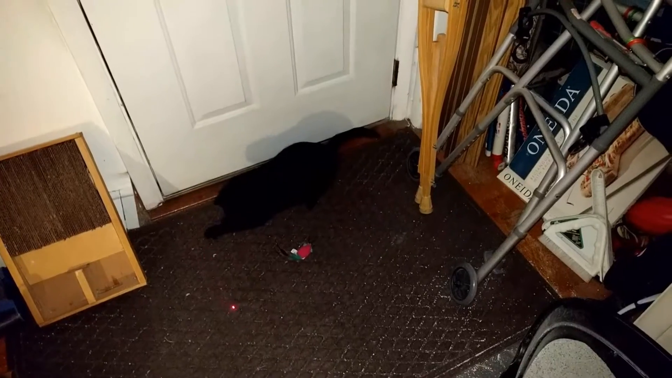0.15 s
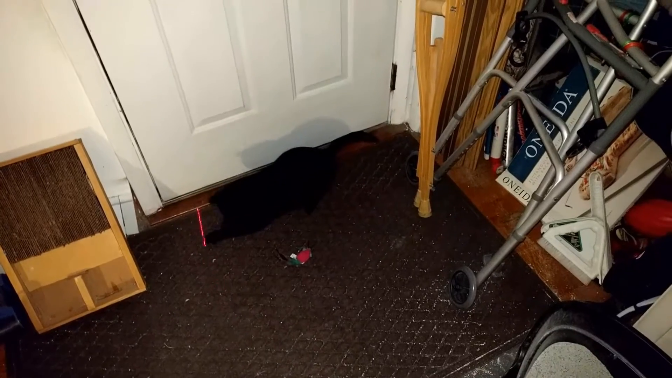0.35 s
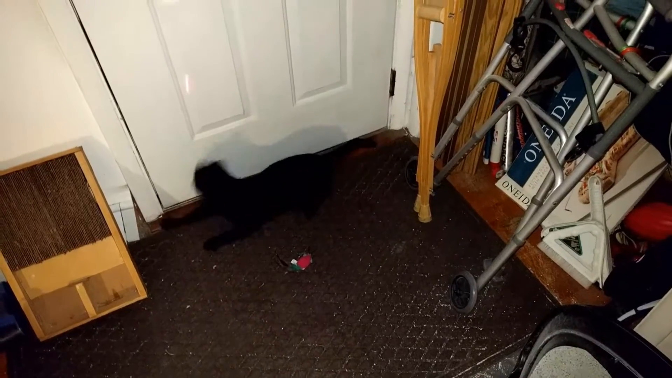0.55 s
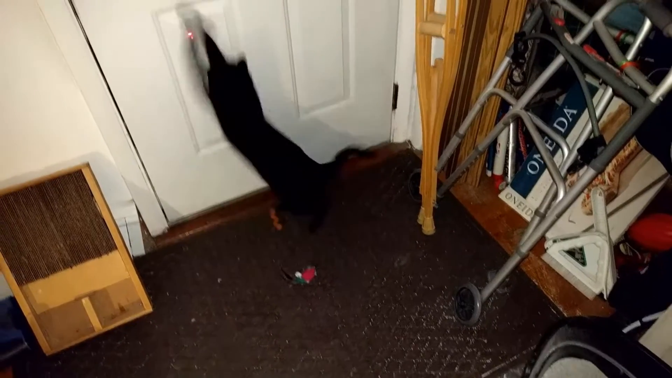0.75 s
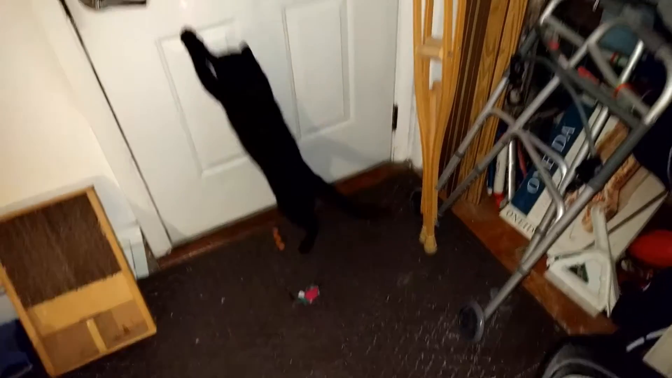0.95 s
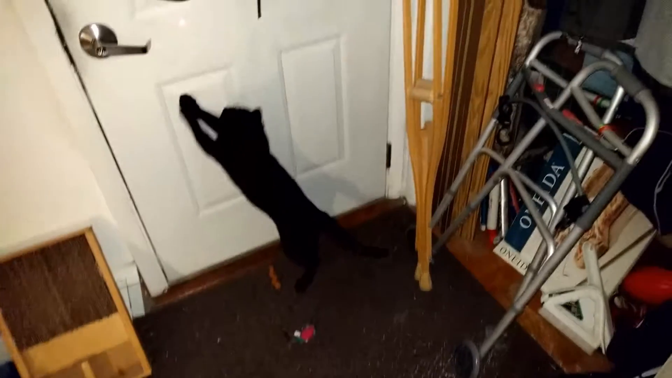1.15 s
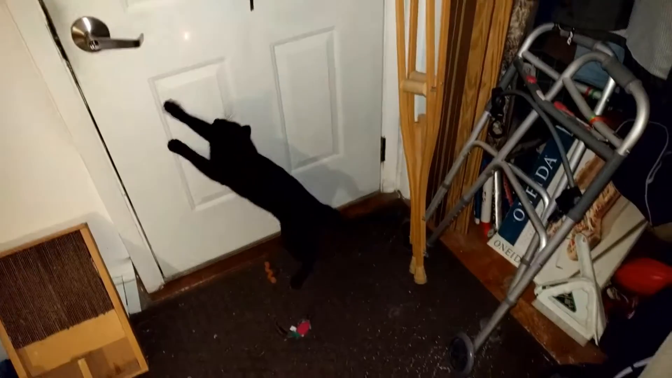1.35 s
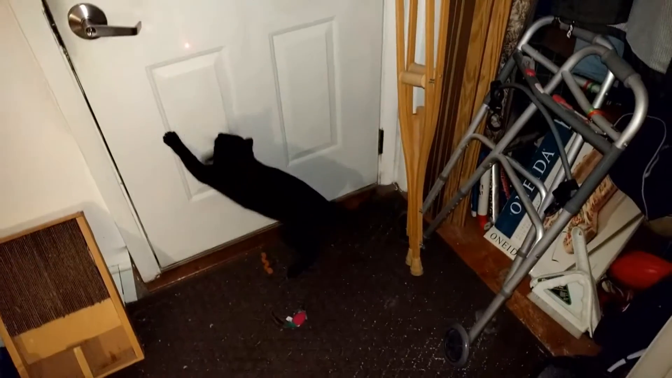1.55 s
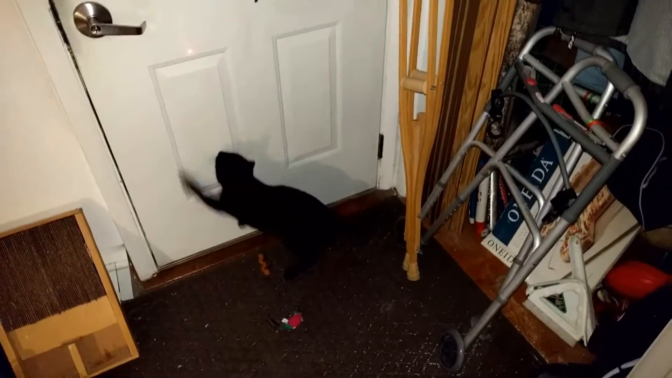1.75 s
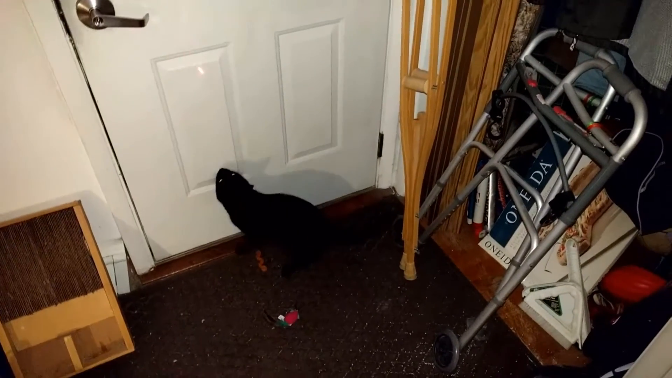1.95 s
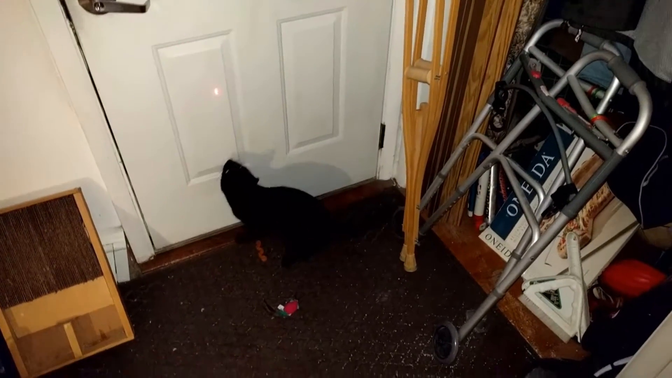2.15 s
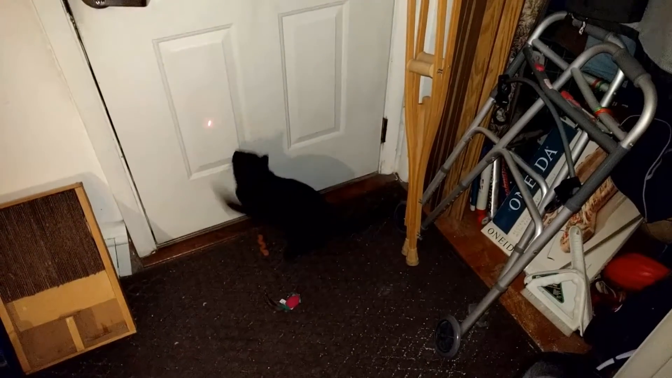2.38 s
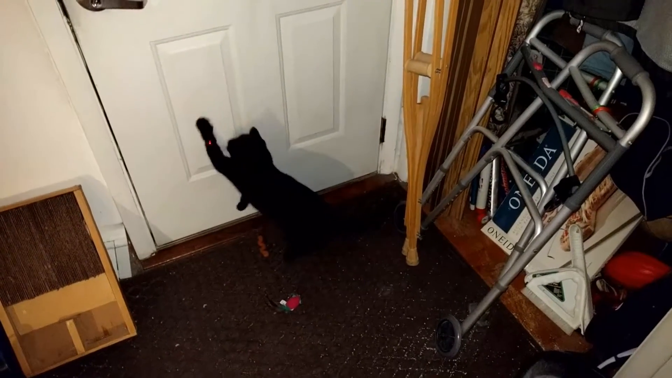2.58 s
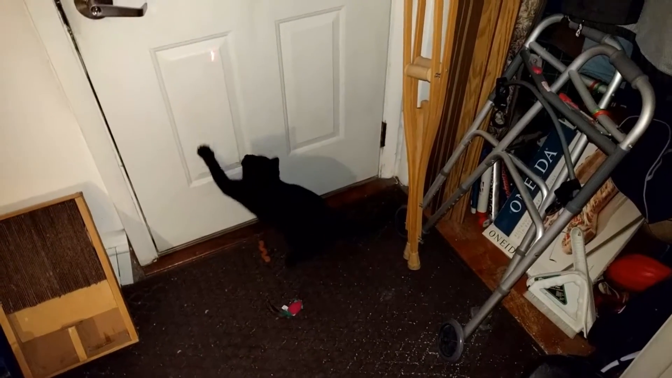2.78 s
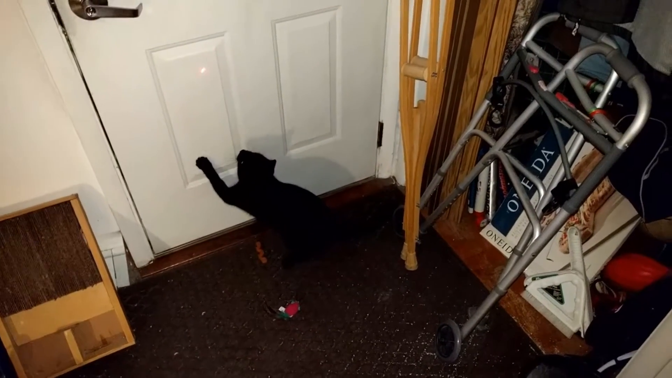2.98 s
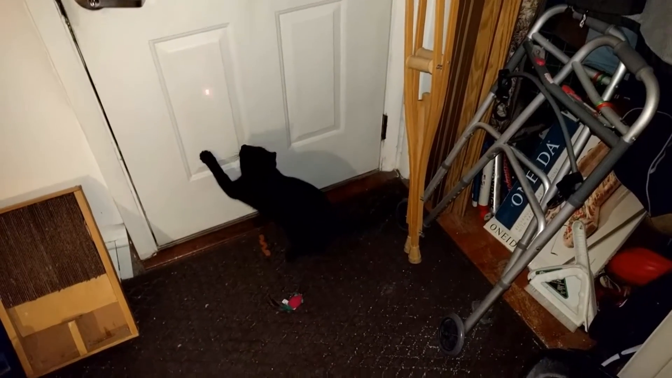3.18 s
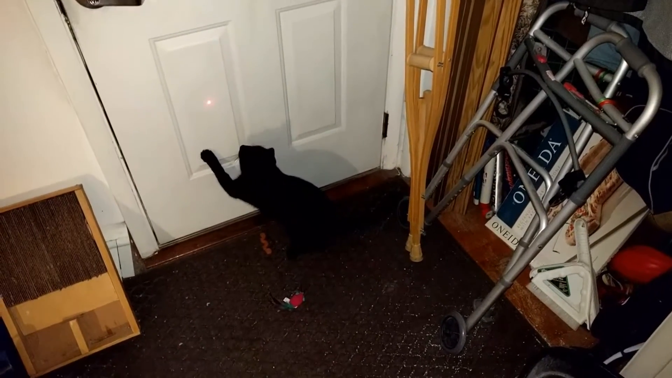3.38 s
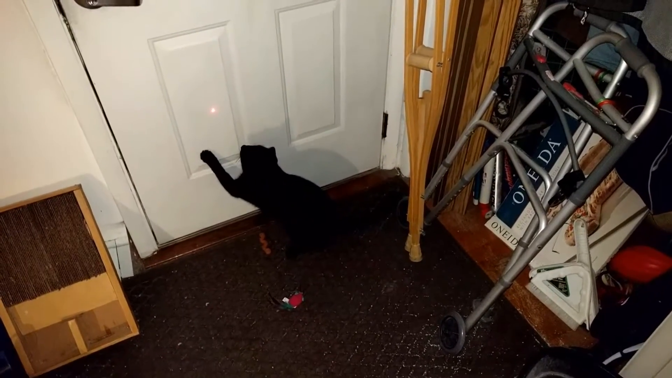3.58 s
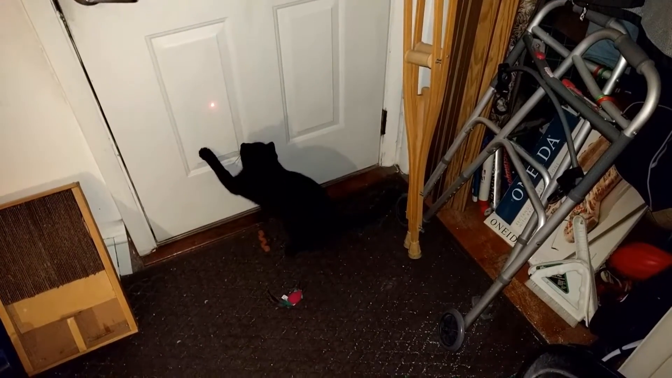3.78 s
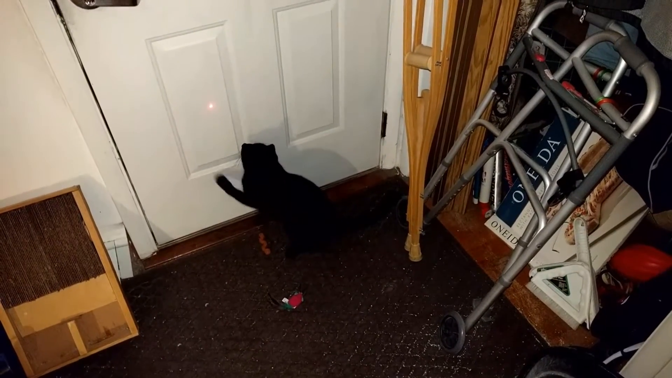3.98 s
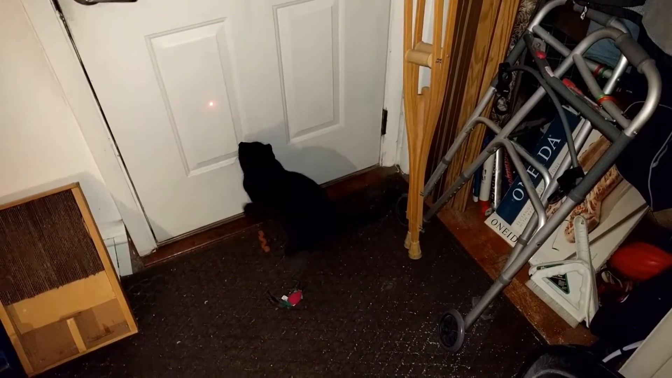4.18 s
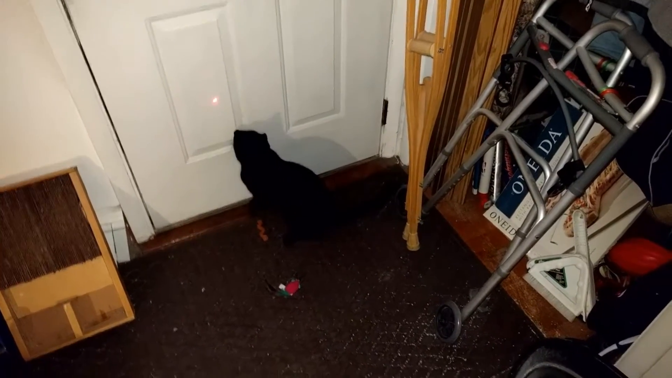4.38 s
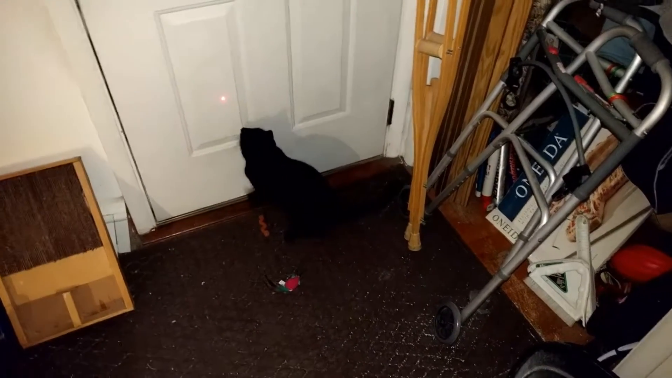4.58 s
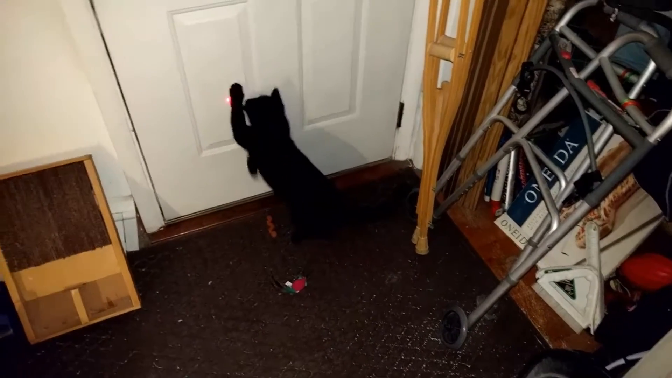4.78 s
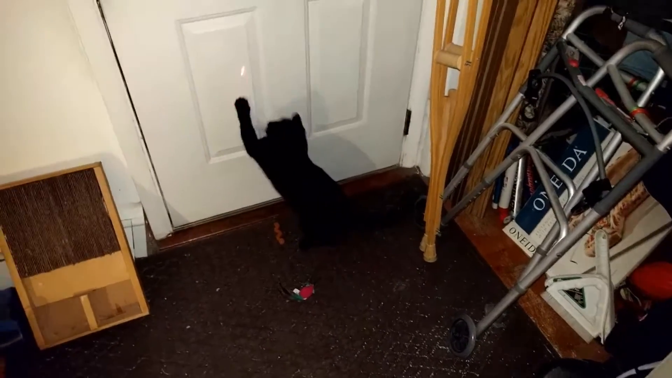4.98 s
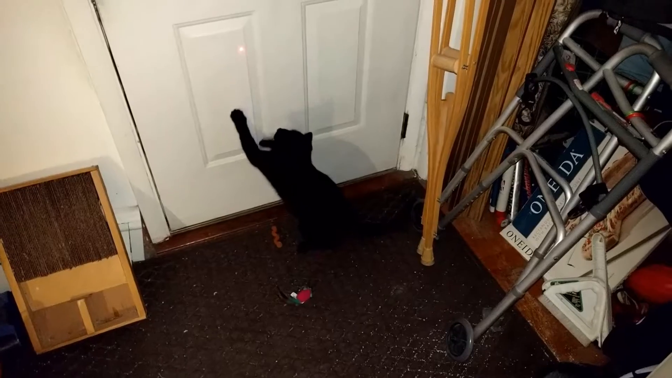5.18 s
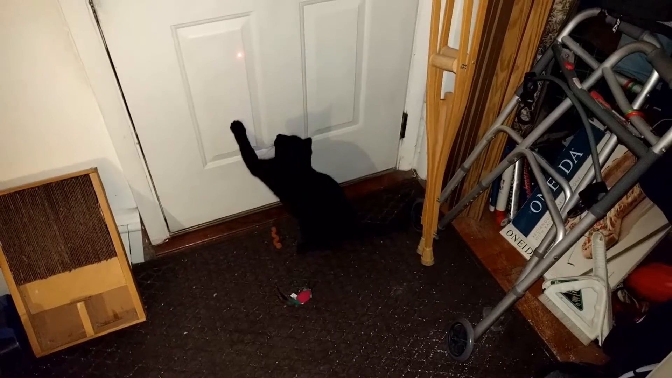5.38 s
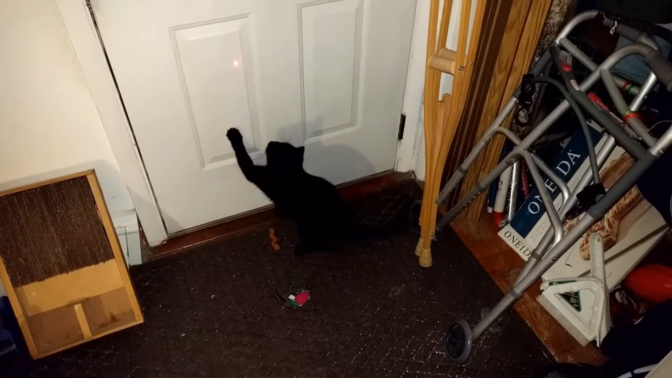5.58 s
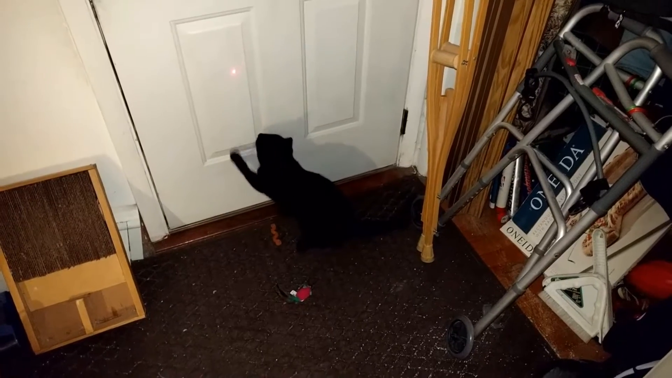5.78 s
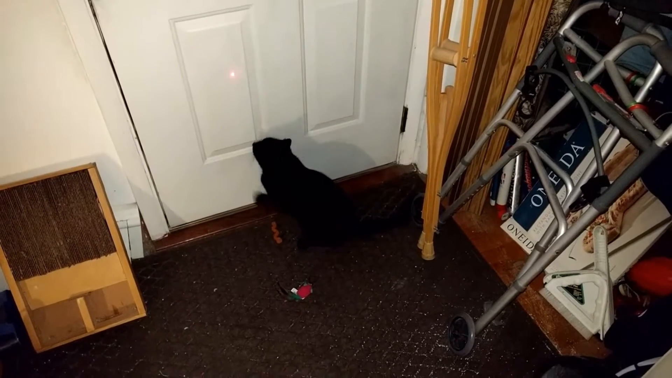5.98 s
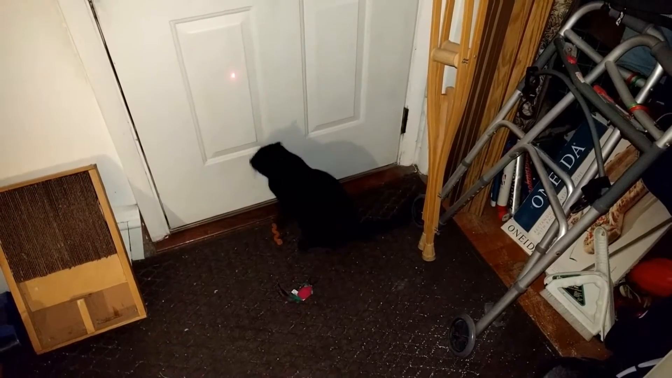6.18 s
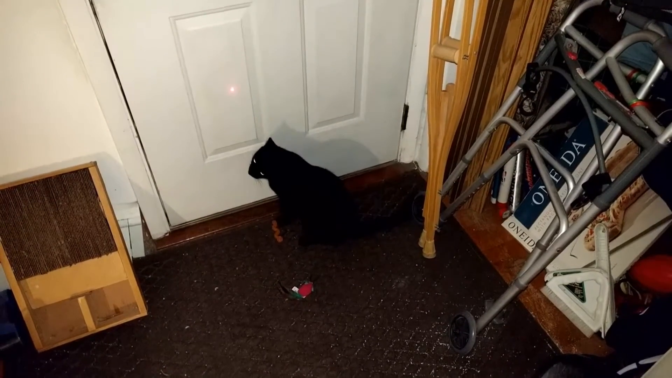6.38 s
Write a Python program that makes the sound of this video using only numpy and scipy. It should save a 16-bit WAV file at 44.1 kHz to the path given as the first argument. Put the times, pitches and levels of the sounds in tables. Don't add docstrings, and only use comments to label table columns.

```python
import sys
import numpy as np
from scipy import signal
from scipy.fft import rfft, irfft
from scipy.io import wavfile
from scipy.ndimage import uniform_filter1d

SR = 44100
rng = np.random.default_rng(int(sys.argv[2]) if len(sys.argv) > 2 else 0)


def invert_db(level):
    return 10 ** (np.asarray(level, dtype=float) / 20)


def store_wav(level_fs):
    pcm = np.round(np.clip(np.atleast_2d(level_fs), -1, 1) * 32767)
    wavfile.write(sys.argv[1], SR, pcm.T.astype(np.int16))


N = 283869

# t/s, peak level/dB, thud re peak/dB, knock re peak/dB, lead-in brush re peak/dB
SLAPS = [
    (0.602, -22, -49.5, -16, -15),
    (0.912, -37, -14, -23, -34),
    (0.931, -11.5, -38, -17, -19.5),
    (1.479, -28, -23.5, -11, -37),
    (2.625, -12.5, -28, -14.5, -16),
    (4.871, -11, -33, -16.5, -20),
]
GATE_SHARE = (2.22, 1.44, .9, 1.7)
HAND_DB = -65.5
STEP = 32


def rms_one(x):
    return x / np.sqrt(np.mean(x ** 2) + 1e-20)


def at_hz(points, hz):
    f, value = np.transpose(points)
    return np.interp(np.log(np.maximum(hz, 1)), np.log(f), value)


def coloured(x, spectrum, low_hz, high_hz):
    hz = np.fft.rfftfreq(x.shape[-1], 1 / SR)
    gain = invert_db(at_hz(spectrum, hz))
    inside = (hz > low_hz) & (hz < high_hz)
    band_rms = np.sqrt(np.sum(gain[inside] ** 2) / len(hz))
    return irfft(rfft(rms_one(x)) * gain, x.shape[-1]) / band_rms


def drift(rate):
    every = 40
    r = np.exp(-2 * np.pi * rate * every / SR)
    draws = rng.standard_normal(N // every + 2002)
    slow = signal.lfilter([1], [1, -2 * r, r * r], draws)[2000:]
    return np.interp(np.arange(N) / every, np.arange(len(slow)), rms_one(slow))


def resonance(x, hz, width_hz):
    r = np.exp(-np.pi * width_hz / SR)
    poles = [1, -2 * r * np.cos(2 * np.pi * hz / SR), r * r]
    return signal.lfilter((1 - r * r) / 2 * np.array([1, 0, -1]), poles, x)


def burst(at_s, rise_s, t60):
    t = np.maximum(np.arange(N) / SR - at_s, 0)
    return (1 - np.exp(-t / rise_s)) * invert_db(-60 * t / t60)


def grit(per_s, spread_db):
    sizes = invert_db(spread_db * np.minimum(rng.exponential(1, N), 4)) * rng.choice([-1, 1], N)
    return sizes * (rng.random(N) < per_s / SR)


def swells(at_s, db, swell_s, fade_s):
    t = np.arange(0, N + STEP, STEP) / SR - np.asarray(at_s)[:, None]
    share = np.where(t < 0, -t / np.abs(swell_s)[:, None], t / np.abs(fade_s)[:, None])
    return np.asarray(db)[:, None] - 20 * share


def power_sum(levels_db):
    total = np.sqrt(np.sum(invert_db(2 * levels_db), axis=0))
    return np.interp(np.arange(N) / STEP, np.arange(len(total)), total)


def slaps():
    # f/Hz, level/dB, t60/s
    door_modes = [(61.7, 4.5, 0.12), (134.4, -6.5, 0.75), (150, -2.5, 0.061), (220.2, -23, 0.074),
                  (253, -20, 0.13), (377, 0, 0.16), (473, -22.5, 0.068), (623, -14.5, 0.061),
                  (766, -28, 0.38)]
    # f/Hz, density/dB
    rattle_spectrum = [(90, -39.5), (140, 0), (250, 4.5), (380, -9.5), (700, -9), (1000, -12),
                       (1200, -52.5)]
    # f/Hz, density/dB
    crack_spectrum = [(530, -31), (900, -21.5), (1340, -6.5), (2230, -9), (3740, -7), (4110, -6.5),
                      (6350, -2), (11600, -18), (13800, -27), (14300, -80.5), (15000, -45)]
    toes = grit(20000, 3.5)
    crack = coloured(toes * invert_db(0.66 * drift(150)), crack_spectrum, 1200, 12000)
    crack = crack + 1.16 * resonance(crack, 6950, 820)
    rattle = coloured(rng.standard_normal(N), rattle_spectrum, 130, 900)
    t, out = np.arange(N) / SR, np.zeros(N)
    push = np.zeros((len(door_modes), N))
    chance = rng.normal(0, 1, (len(SLAPS), len(door_modes)))
    lowest = np.arange(len(door_modes)) < 1
    for (s, db, thud_db, knock_db, brush_db), luck in zip(SLAPS, chance):
        brush = invert_db(brush_db - 1020 * np.abs(s - t)) * (t > s - .03) * (t < s + .01)
        contact = 3.65 * burst(s, 0.017, 0.042) + 0.53 * burst(s, 0.019, 0.23) + brush
        out += invert_db(db - 8.5) * crack * contact
        out += invert_db(db + knock_db - 10.0) * rattle * burst(s, 0.0083, 0.37)
        push[:, round(s * SR)] = invert_db(db + np.where(lowest, thud_db, knock_db) + 2.5 * luck)
    for (hz, db, t60), kick in zip(door_modes, push):
        r, w = invert_db(-60 / (t60 * SR)), 2 * np.pi * hz / SR
        soft = signal.lfilter([.03], [1, -.97], kick + 1e-18)
        out += invert_db(db - 11.0) * signal.lfilter([0, np.sin(w)], [1, -2 * r * np.cos(w), r * r], soft)
    return out


def through_skin(x):
    # f/Hz, bandwidth/Hz, level/dB
    skin_modes = [(1299, 67, -1), (1590, 164, -4), (2026, 180, -5.8), (2700, 530, 2.5), (2730, 880, 0.5),
                  (3780, 230, -11.5)]
    modes = 0
    for k, (hz, width_hz, db) in enumerate(skin_modes):
        modes = modes + (-1) ** k * invert_db(db) * resonance(x, hz, width_hz)
    modes = signal.sosfilt(signal.butter(6, 1150, "high", fs=SR, output="sos"), modes)
    return rms_one(signal.sosfilt(signal.butter(4, 4500, fs=SR, output="sos"), modes))


def slides():
    # t of most force/s, hiss level/dB, swell/s, fade/s, skin re hiss/dB
    strokes = [(.718, -73, 0.06, 0.24, -17), (.796, -64.5, 0.012, 0.043, -24),
               (0.883, -72, 0.033, .04, -16), (0.998, -42, .02, .11, -4), (1.245, -47.5, 0.51, 0.17, -13),
               (1.464, -44, 0.11, 0.039, -12.5), (1.54, -44, .06, .13, -16.5),
               (1.807, -57.5, 0.056, .07, -12), (2.689, -34, 0.06, .25, -20.5),
               (2.878, -43, 0.27, 0.41, -9.5), (3.0, -37, 0.7, 0.14, -14), (3.35, -70.5, 0.6, 0.18, -11.5),
               (4.16, -58.5, 0.021, 0.086, -11.5), (4.93, -35.5, 0.042, 0.089, -11),
               (5.134, -35, 0.13, .2, -10), (5.34, -43.5, 0.1, 1, -11), (5.55, -56.5, 0.64, 0.45, 3.5),
               (5.801, -59, 0.13, 0.12, 6), (5.868, -39.5, .12, 0.05, -20.5), (6.1, -66, 0.043, 0.064, -14),
               (6.194, -61, 0.13, 0.12, -12), (.05, -72, 0.064, 0.23, -15), (4.0, -70.5, 0.16, 0.29, -8.5)]
    # t/s, edge level/dB, swell/s, fade/s
    digs = [
        (.595, -62, .03, .03),
        (1.26, -58, .1, 0.11),
        (1.53, -52, 0.2, 0.059),
        (1.81, -64, .05, 0.066),
        (2.94, -48, 0.25, 0.17),
    ]
    # f/Hz, density/dB
    rub_spectrum = [(1760, -16.5), (3000, -14.5), (4130, -9.5), (4360, -8), (6620, -0.5), (10700, -28),
                    (11600, -31.5), (12400, -40), (13300, -58.5)]
    lift_offs = [.86, 1.7, 3.168, 5.921, 6.3]
    lift_db_per_s = 235
    s, db, swell_s, fade_s, skin_db = np.transpose(strokes)
    t = np.arange(0, N + STEP, STEP) / SR
    landed = np.array([max([0] + [row[0] for row in SLAPS if row[0] < a]) for a in s])
    lifted = np.array([min(off for off in lift_offs + [N / SR] if off > a) for a in s])
    force_db = swells(s, db, swell_s, fade_s)
    force_db = force_db - lift_db_per_s * np.maximum(t - lifted[:, None], 0)
    force_db = force_db - 100 * (t < landed[:, None])
    edge_db = -30.5 - 0.39 * skin_db
    edge_levels = np.vstack([force_db + edge_db[:, None] - 0.5, swells(*np.transpose(digs))])

    hiss = coloured(grit(20000, 0.4) * invert_db(1.02 * drift(40)), rub_spectrum, 2700, 9000)
    hiss = signal.sosfilt(signal.butter(8, 1300, "high", fs=SR, output="sos"), hiss)
    edge = signal.sosfiltfilt(signal.butter(3, 8800, "high", fs=SR, output="sos"), hiss)
    skin = through_skin(grit(12000, 2.8) * invert_db(1.3 * drift(30)))
    rubbing = power_sum(force_db) * (hiss - edge)
    claws = power_sum(edge_levels) * rms_one(edge)
    return rubbing + claws + power_sum(force_db + skin_db[:, None] + 3.5) * skin


def in_time(rows):
    s, *columns = np.transpose(rows)
    return [np.interp(np.arange(N) / SR, s, c) for c in columns]


def while_on(spans, fade_s):
    t, total = np.arange(N) / SR, 0
    for rows in spans:
        inside_s = np.minimum(t - rows[0][0], rows[-1][0] - t)
        total = total + np.clip((inside_s + fade_s) / fade_s, 0, 1)
    return total


def squeaks():
    # t/s, slip rate f/Hz, level/dB
    slip_curves = [
        [(.97, 1450, -44), (1.06, 1290, -63.5), (1.25, 1450, -62.5), (1.32, 1350, -63), (1.36, 1330, -65)],
        [(2.78, 2020, -51.5), (2.84, 2150, -46), (2.88, 2210, -40.5), (2.925, 1940, -46.5), (2.95, 2530, -46.5),
         (3.0, 2750, -52), (3.09, 2800, -56)],
        [(5.05, 1670, -55), (5.135, 1780, -33), (5.18, 1760, -39.5), (5.23, 1800, -46.5), (5.28, 2060, -51.5),
         (5.38, 2310, -44.5), (5.45, 2300, -49), (5.5, 2540, -48), (5.56, 2560, -58)],
    ]
    # overtones/dB, flutter/1
    grips = [
        (-28, 1.6),
        (-3, 0.81),
        (-8, .9),
    ]
    slip_hz, db = in_time(np.vstack(slip_curves))
    grip_rows = []
    for rows, grip in zip(slip_curves, grips):
        grip_rows += [(rows[0][0], *grip), (rows[-1][0], *grip)]
    over_db, flutter = in_time(grip_rows)
    wander = 0.082 * drift(60.07) + 0.16 * drift(300)
    phase = 2 * np.pi * np.cumsum(slip_hz + flutter * (slip_hz - 950) * wander) / SR
    overtones = np.sin(2 * phase) + .5 * np.sin(3 * phase)
    tone = np.sin(phase) + invert_db(over_db - 0.5) * overtones
    return while_on(slip_curves, 0.0094) * invert_db(db + 2.5 + 0.74 * drift(80)) * tone


def bumps():
    # t/s, peak level/dB, f/Hz
    soft_bumps = [(0.019, -53, 218), (.606, -59, 198), (.608, -43, 732), (.928, -31, 233), (.93, -29, 136),
                  (.93, -31.5, 1314), (.932, -36, 1580), (.975, -34.5, 194), (1.05, -42.5, 182),
                  (1.48, -51.5, 477), (1.488, -43, 232), (1.618, -73, 130), (2.023, -44, 189),
                  (2.071, -50.5, 135)]
    t, out = np.arange(N) / SR, 0
    for s, db, hz in soft_bumps:
        out = out + invert_db(db + 8) * burst(s, 0.0055, 0.064) * np.sin(2 * np.pi * hz * (t - s))
    return out


def hall(x):
    # f/Hz, t60/s
    hall_decay = [(100, 0.12), (1500, 0.053), (6000, 0.053), (12000, 0.06)]
    t, band_edges = np.arange(SR // 2) / SR, 100 * 2. ** np.arange(8)
    white, echo = rng.standard_normal((2, len(t))), 0
    for low, high in zip(band_edges, band_edges[1:]):
        band = signal.sosfilt(signal.butter(2, [low, high], "band", fs=SR, output="sos"), white)
        t60 = at_hz(hall_decay, np.sqrt(low * high))
        echo = echo + band * invert_db(-60 * t / t60) * (t > .005)
    echo = echo / np.sqrt(np.sum(echo[0] ** 2))
    mid, side = signal.fftconvolve(x[None], echo, axes=1)[:, :N]
    return mid + .8 * side * np.array([[1], [-1]])


def handling():
    # t/s, level/dB, length/s
    jolts = [(0.046, -55, 0.052), (.14, -57, 0.064), (0.284, -60, 0.073), (1.178, -34.5, 0.064),
             (1.24, -46, 0.073), (1.337, -48.5, 0.21), (1.497, -46, 0.074), (1.564, -45.5, 0.14),
             (1.645, -38, 0.035), (1.716, -39, 0.055), (1.825, -45, 0.1), (1.987, -45.5, 0.17),
             (2.123, -51, 0.11), (2.9, -61.5, .05), (2.969, -56, 0.18), (3.421, -73, 0.082),
             (3.917, -40.5, 0.054), (3.987, -34, 0.029), (4.055, -43, 0.071), (4.153, -35.5, 0.031),
             (4.332, -48, 0.17), (4.461, -44, 0.052), (4.606, -38.5, 0.034), (5.57, -52.5, 0.12),
             (6.206, -48.5, 0.11), (6.318, -41, 0.12)]
    s, db, length = np.transpose(jolts)
    return power_sum(swells(s, db, 0.64 * length, length))


def gate_db():
    # t from/s, t to/s, change/dB
    gate_moves = [(0.211, 0.253, -6.5), (0.331, 0.423, -5.5), (0.49, 0.54, -2), (0.796, .89, -1),
                  (1.0, 1.6, 3), (2.248, 2.258, -8.5), (2.357, 2.359, -6), (2.805, 2.949, -8.5),
                  (2.97, 3.132, 5), (3.17, 3.24, 0.5), (3.487, 3.591, -12), (3.81, 3.826, -3),
                  (4.153, 4.158, 3), (4.711, 4.728, -5.5), (4.797, 4.828, -2), (4.95, 5.905, 4.5),
                  (6.035, 6.065, 0)]
    t, total, ramp_s = np.arange(N) / SR, 0, 0.046
    for start, end, db in gate_moves:
        total = total + db * np.clip(np.minimum(t - start, end - t) / ramp_s + 1, 0, 1)
    return total


def rumble():
    # t/s, level/dB, swell/s, fade/s
    shudders = [
        (.945, -35.5, 0.041, 0.16),
        (1.09, -41.5, 0.13, 0.022),
        (2.65, -28.5, 0.031, 0.066),
        (2.719, -37.5, .1, 0.13),
        (4.9, -32, 0.042, 0.18),
        (4.979, -32, 0.098, 0.068),
    ]
    wobble_hz = 62 * invert_db(1.6 * drift(4.1) + 2.1 * drift(30))
    phase = 2 * np.pi * np.cumsum(wobble_hz) / SR
    tremor = invert_db(HAND_DB + GATE_SHARE[3] * np.minimum(gate_db(), 0))
    shudder = power_sum(swells(*np.transpose(shudders)))
    force = np.hypot(np.hypot(handling(), shudder), tremor)
    cycles = np.sin(phase) + 0.14 * np.sin(2 * phase + 3 * drift(6))
    return force * invert_db(-1.0 + 4.1 * drift(4.1)) * cycles


def room_tone():
    # f/Hz, density/dB
    hiss_spectrum = [(900, -4.5), (2000, 2.5), (3700, -2), (6400, 1.5), (8800, -4.5), (15500, -5.5),
                     (17000, -10.5)]
    murmur_spectrum = [(300, -18.5), (400, -1.5), (700, -4.5), (1000, -7), (1500, -12), (2200, -28.5)]
    hum_spectrum = [(60, -19), (110, 8.5), (250, 6.5), (400, -1), (520, -20)]
    rest_levels = (-82, -77.5, -72)
    jolt = uniform_filter1d(handling(), size=2000) / invert_db(HAND_DB)
    opened_db = gate_db() + 0.067 * 20 * np.log10(1 + jolt)
    hiss_db, murmur_db, hum_db = [db + share * opened_db for db, share in zip(rest_levels, GATE_SHARE)]
    after = sum(invert_db(row[1]) * burst(row[0], 0.0055, 1) for row in SLAPS)

    def swollen(db, after_slap_db, loudest_db):
        swell = invert_db(after_slap_db + np.minimum(opened_db, 0)) * after
        return np.minimum(np.hypot(invert_db(db), swell), invert_db(loudest_db))

    murmur_gain, hum_gain = swollen(murmur_db, -43, -68.5), swollen(hum_db, -40.5, -67.5)
    white, sides = rng.standard_normal((3, 2, N)), np.array([[1], [-1]])
    hiss, murmur, hum = white[:, :1] + 0.027 * white[:, 1:] * sides
    whine = invert_db(-5) * rms_one(resonance(rng.standard_normal(N), 4340, 40))
    hiss = (coloured(hiss, hiss_spectrum, 11450, 16900) + whine) * invert_db(hiss_db + 2.9 * drift(9.8))
    murmur = coloured(murmur, murmur_spectrum, 490, 1000) * murmur_gain
    return hiss + murmur + coloured(hum, hum_spectrum, 130, 400) * hum_gain


def scene():
    door = slaps() + slides() + squeaks() + bumps()
    return door * invert_db([[-.4], [.4]]) + invert_db(-24.0) * hall(door) + rumble() + room_tone()


def band_dropouts(x):
    # f/Hz, level re hiss/dB
    drop_curve = [(260, -60), (330, -18.5), (650, -29), (1050, -55), (1300, -50), (8000, -52), (9500, -42),
                  (10300, -28), (11500, -23.5), (15000, -15.5)]
    hz, _, cells = signal.stft(x, SR, nperseg=2048, noverlap=1536)
    power = uniform_filter1d(np.mean(np.abs(cells) ** 2, axis=0), size=8, axis=0)
    loud = power[(hz > 4000) & (hz < 9000)].mean(axis=0)
    busy = loud > invert_db(2 * -31.5) * loud.max()
    treble = np.where(busy, np.maximum(loud, invert_db(2 * -20.5) * loud.max()), loud)
    loud = np.where(hz[:, None] > 8000, treble, loud)
    luck = rng.standard_normal((len(hz) // 12 + 1, power.shape[1] // 2 + 1))
    luck = np.repeat(np.repeat(luck, 12, axis=0), 2, axis=1)
    luck_db = 9 * luck[:len(hz), :power.shape[1]]
    kept = power > loud * invert_db(2 * at_hz(drop_curve, hz)[:, None] + luck_db)
    return signal.istft(cells * kept, SR, nperseg=2048, noverlap=1536)[1][:, :N]


def top_cut(x):
    return signal.sosfilt(signal.butter(12, 15710, fs=SR, output="sos"), x)


def record(dry):
    dry = signal.sosfilt(signal.butter(2, 35, "high", fs=SR, output="sos"), dry)
    mix = band_dropouts(dry) - .0008
    return top_cut(mix)


dry = scene()
out = record(dry)
store_wav(out)
```